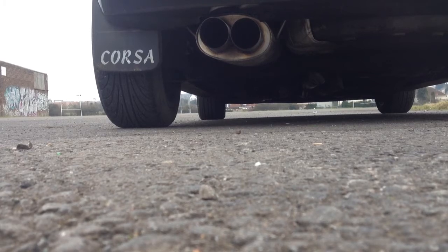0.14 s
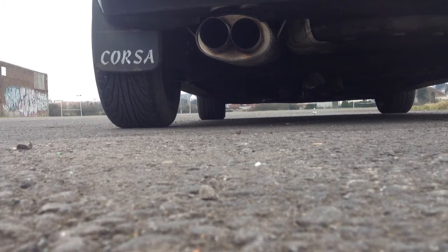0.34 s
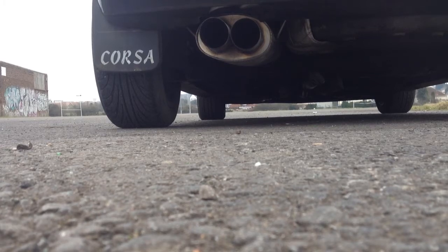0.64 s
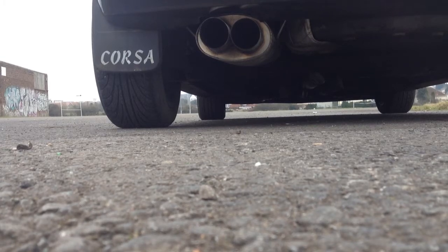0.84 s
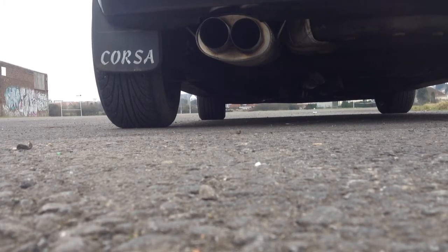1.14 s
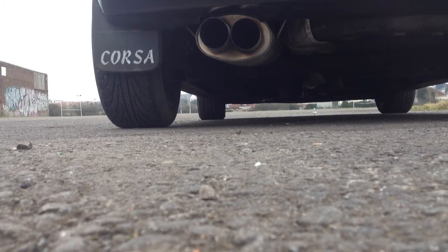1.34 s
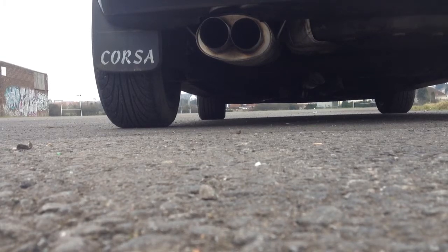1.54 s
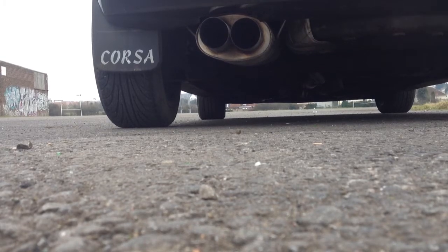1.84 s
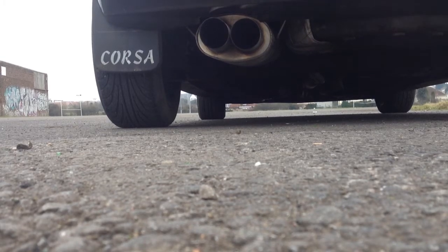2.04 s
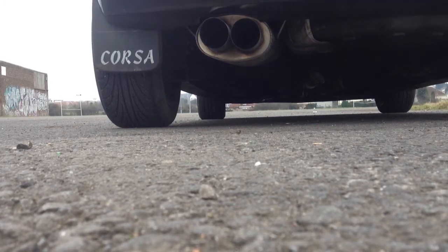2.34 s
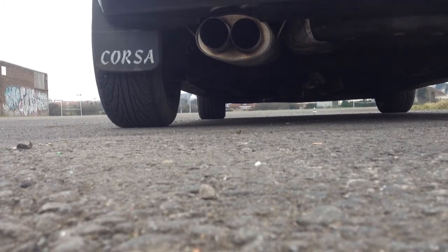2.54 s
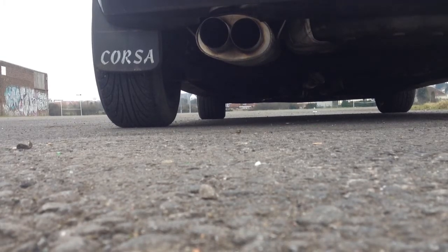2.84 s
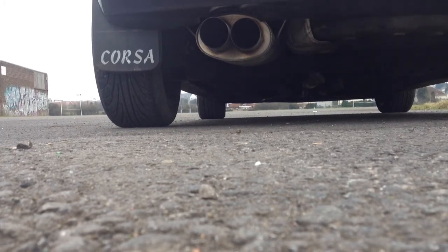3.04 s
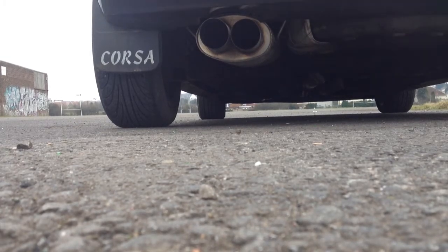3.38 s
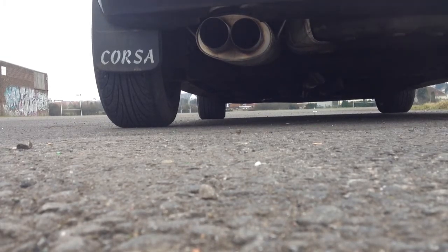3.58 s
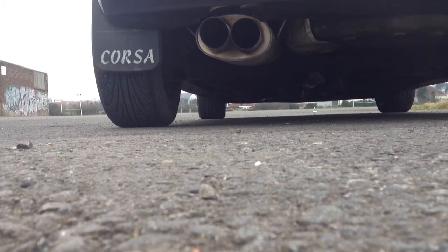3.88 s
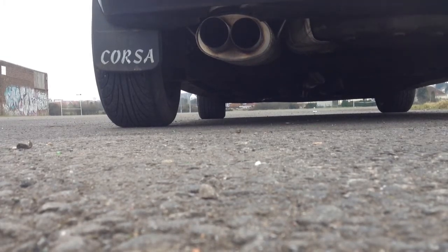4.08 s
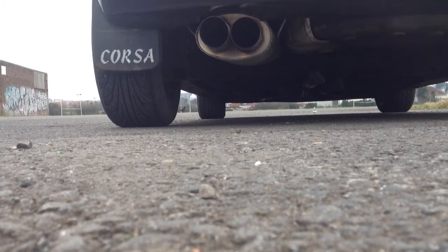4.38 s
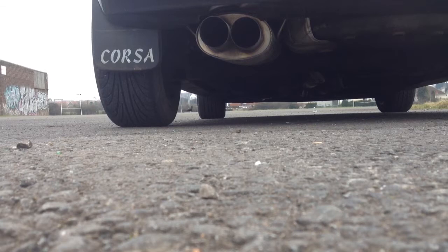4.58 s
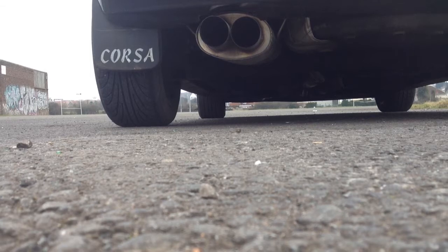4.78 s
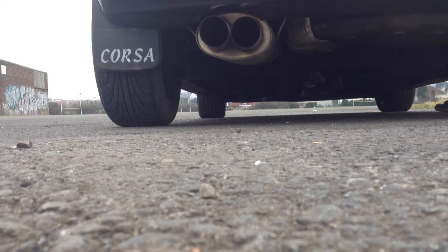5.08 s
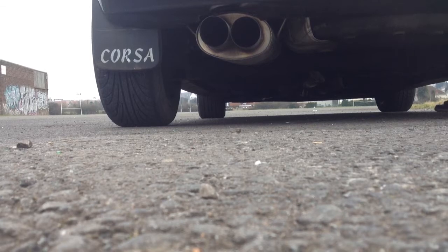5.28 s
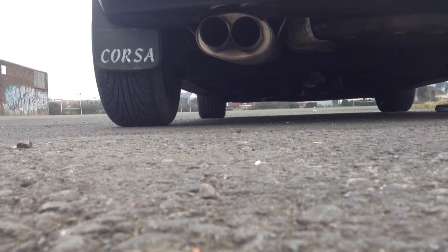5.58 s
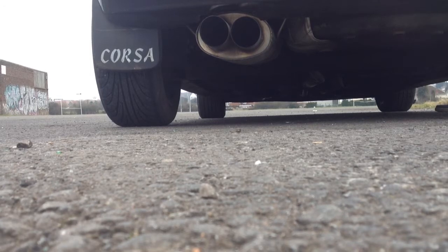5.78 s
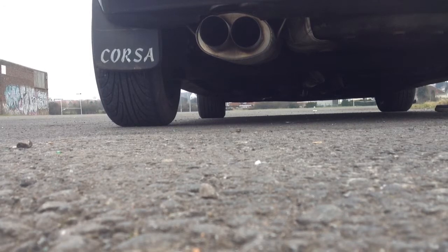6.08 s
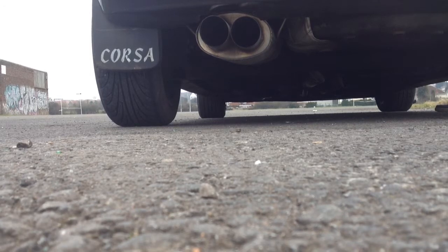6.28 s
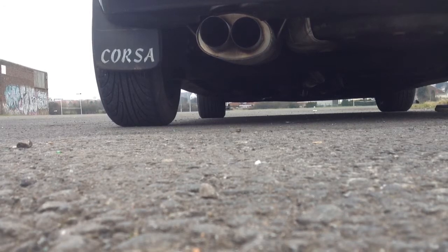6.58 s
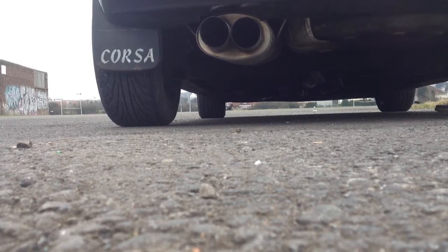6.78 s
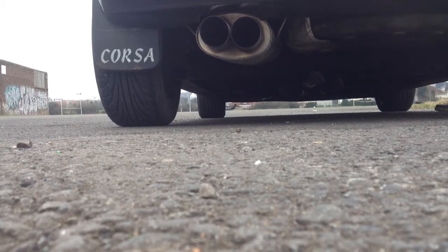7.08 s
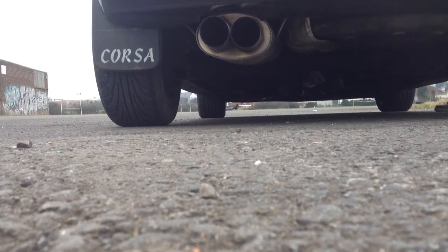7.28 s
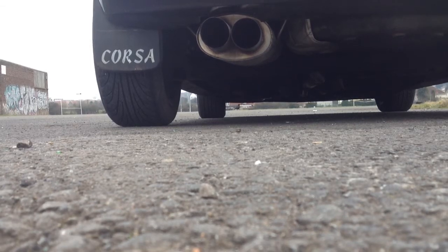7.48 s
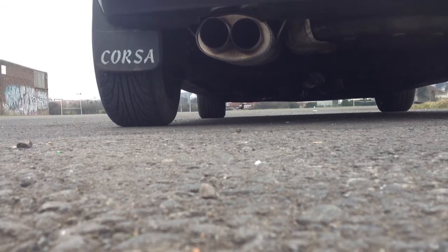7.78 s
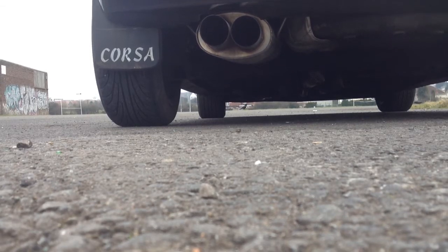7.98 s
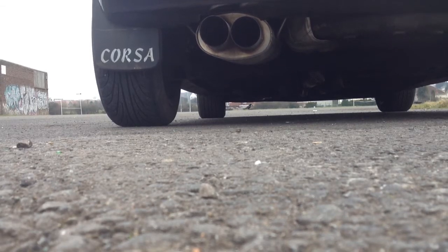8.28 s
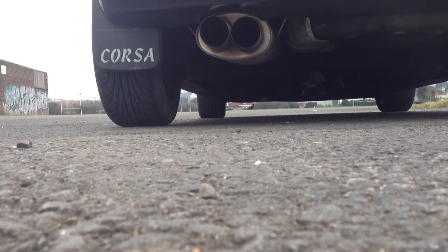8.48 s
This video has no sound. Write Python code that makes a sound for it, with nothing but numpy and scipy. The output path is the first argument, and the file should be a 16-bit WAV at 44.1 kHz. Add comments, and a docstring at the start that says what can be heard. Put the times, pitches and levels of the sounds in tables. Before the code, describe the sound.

Close behind the exhaust, a car engine putters and clatters outdoors; a door slams loudly, then short revs bark and sink back.

```python
"""A small four-cylinder car idles in an open lot, heard from the ground behind its sports exhaust:
uneven puffs boom in the silencer over a clatter of valve gear. Someone gets in with rustles and
knocks, then slams the door; the slam ducks the automatic gain, which takes seconds to creep back.
The throttle is blipped: a hard bark on the way up, a smooth drone over a rushing, rattling engine
as the revs sink. A second blip goes higher, and the sound ends as a third begins."""
import sys
import numpy as np
from scipy import signal
from scipy.fft import rfft, irfft
from scipy.io import wavfile
from scipy.ndimage import uniform_filter1d

SR = 44100
rng = np.random.default_rng(int(sys.argv[2]) if len(sys.argv) > 2 else 0)


def bounce(signal):
    """Save signal as a 16-bit WAV file at the path given by the first command-line argument."""
    frames = np.transpose(np.atleast_2d(signal))
    limited = np.clip(frames, -1, 1)
    pcm = np.round(limited * 32767).astype(np.int16)
    wavfile.write(sys.argv[1], SR, pcm)


N = 380583
TIME = np.arange(N) / SR


def from_db(db):
    """Decibels to gain."""
    return 10 ** (np.asarray(db) / 20)


def unit_rms(x):
    """Scale to unit power."""
    return x / np.sqrt(np.mean(x ** 2) + 1e-20)


def ramp(start, length):
    """Fade from 0 to 1 over the given seconds."""
    return np.clip((TIME - start) / length, 0, 1)


def bell(centre, half):
    """A smooth swell of height 1."""
    return np.exp(-np.minimum(((TIME - centre) / half) ** 2, 50))


def eq(x, curve, size=8192):
    """Minimum-phase equaliser following rows of f/Hz, gain/dB."""
    hz, db = np.transpose(curve)
    grid = np.maximum(np.fft.rfftfreq(size, 1 / SR), 1)
    gain = from_db(np.interp(np.log(grid), np.log(hz), db))
    cepstrum = irfft(np.log(gain))
    cepstrum[1:size // 2] *= 2
    cepstrum[size // 2 + 1:] = 0
    impulse = irfft(np.exp(rfft(cepstrum)))
    return signal.fftconvolve(x, impulse)[:N]


def resonate(x, hz, width_hz):
    """One resonance, gain 1 at its peak."""
    r = np.exp(-np.pi * width_hz / SR)
    feedback = [1, -2 * r * np.cos(2 * np.pi * hz / SR), r * r]
    return signal.lfilter(np.array([1, 0, -1]) * (1 - r * r) / 2, feedback, x + 1e-18)


def noise():
    """White noise."""
    return rng.standard_normal(N)


def narrow_noise(hz, width_hz):
    """Noise twice through one resonance, unit power."""
    return unit_rms(resonate(resonate(noise(), hz, width_hz), hz, width_hz))


# Engine speed, a wavering idle and then the revs: t/s, firing rate/Hz
ENGINE_SPEED = [(0, 26.46), (.6, 25.57), (1.8, 26.1), (2.5, 25.65), (3.5, 26.145), (6.48, 25.61),
                (6.581, 35.35), (6.826, 68.93), (7.239, 56.4), (7.46, 55.51), (7.573, 62.6), (7.709, 89.61),
                (7.942, 83.95), (8.381, 65.81), (8.54, 65.5), (8.63, 72.4)]

def firings():
    """The firing rate, the running count of firings, and the samples where exhaust valves open."""
    rate_hz = np.interp(TIME, *np.transpose(ENGINE_SPEED))
    count = np.cumsum(rate_hz) / SR + .79
    opens = np.flatnonzero(np.diff(np.floor(count))) - int(.008 * SR)
    return rate_hz, count, np.maximum(opens, 0)


# Lope of the four cylinders, one puff each: level/dB
CYLINDER_LOPE = [-3, -1, -0.9, -1]
# Tone of a puff through pipe and silencer: f/Hz, idle level/dB, coasting level/dB, throttle level/dB
PUFF_TONE = [(30, -58, -60, -45), (60, -20, -18, -21), (88.5, -19, -30.5, -11), (129.8, -14, -9, -9.5),
             (165.5, 5.5, -0.5, 8), (207.5, 8, 7, 6.5), (246, 6.5, -6.5, 7.5), (285, -28.5, -24, -10.5),
             (349.5, -29, -8.5, -7.5), (374, -35, -11.5, -6), (434, -36, -38.5, -15.5),
             (480, -36, -40, -14), (588, -46, -46, -28.5), (730, -29, -75, -29.5), (1830, -62, -90, -73)]

def exhaust(opens, throttle, overrun, revved):
    """One puff per firing booms in the silencer: ragged at idle, steadier under load and on overrun."""
    jitter_db = 3.1 + (.5 - 3.1) * throttle[opens]
    jitter_db += (1.15 - jitter_db) * overrun[opens]
    lope_db = np.resize(np.roll(CYLINDER_LOPE, -1), len(opens)) * (1 - revved[opens])
    even, ragged = np.zeros((2, N))
    even[opens] = 1
    ragged[opens] = from_db(lope_db + jitter_db * np.clip(rng.standard_normal(len(opens)), -2.5, 1.3))
    blend = [(1 - throttle) * (1 - revved), (1 - throttle) * revved, throttle]
    hz, *tones = np.transpose(PUFF_TONE)

    def pipe(puffs):
        """Speed and an open throttle give shorter, harder puffs."""
        return sum(eq(puffs * share, np.c_[hz, db]) for share, db in zip(blend, tones))

    # mean power per firing keeps the loudness even as harmonics cross the resonance
    power = np.add.reduceat(pipe(even) ** 2, opens)[:-1] / np.diff(opens)
    midpoints = (opens[1:] + opens[:-1]) / 2
    return pipe(ragged) / np.sqrt(np.interp(np.arange(N), midpoints, power))


def rear_chamber(puffs, revved, hz=300, width_hz=70, idle_db=7, rev_db=-6):
    """The silencer's rear chamber answers each puff late and higher, so it seems to bend upward."""
    ring = puffs
    for _ in range(3):
        ring = resonate(ring, hz, width_hz)
    return ring * from_db(idle_db + (rev_db - idle_db) * revved)


# Low churn of gas in the silencer: f/Hz, level/dB
GAS_TONE = [(30, -35), (60, -1), (110, -12), (190, 16.5), (280, 15.5), (350, 21), (450, -17), (600, -14),
            (1000, -37)]

def gas_rumble(throttle, revved, idle_db=-14, coasting_db=-25, throttle_db=-21):
    """Turbulence rumbles between the puffs, weakest beside them when coasting."""
    shut_db = idle_db + (coasting_db - idle_db) * revved
    level_db = shut_db * (1 - throttle) + throttle_db * throttle
    return unit_rms(eq(noise(), GAS_TONE)) * from_db(level_db)


# The engine's rush at idle and at speed: f/Hz, level/dB
IDLE_RUSH_TONE = [(240, -34.5), (400, -13), (620, -5), (900, -8), (1400, -3), (1930, -6), (2400, -7.5),
                  (3700, -11.5), (5300, -21.5), (6300, -21), (8300, -28), (9400, -34.5), (15400, -36)]
REV_RUSH_TONE = [(240, -10.5), (400, 6), (520, 0.5), (610, -7), (730, -7), (1400, -6), (1930, 1.5),
                 (2250, -7), (3700, -11), (5250, -22), (6450, -20), (8300, -28), (9450, -35.5),
                 (15400, -38.5)]
# Early reflections between asphalt and floor pan: delay/s, level/dB
UNDERBODY_ECHOES = [(.0031, -21), (.0074, -15.5), (0.0136, -32.5), (0.0175, -19), (.0269, -16)]
# Ring of pipe and heat shield: f/Hz, width/Hz, idle level/dB, revved level/dB
METAL_RINGS = [(512, 31, -10.5, -17), (726, 40, -8.5, -14.5), (947, 140, -7.5, -19),
               (1184.7, 39, -4.5, -9.5), (1746, 89, -5.5, -15), (1954, 255, -3.5, -7.5),
               (10600, 430, -59, -33)]

def clatter(count, revved, throb_db=1.32, grain_db=1.5, ring_throb_db=6):
    """Valve gear and rushing air: grainy noise that throbs with the firings and rings in the metal."""
    grains = np.interp(TIME, np.linspace(0, TIME[-1], 3000), rng.standard_normal(3000))
    throb = np.cos(2 * np.pi * (count - .08))
    drive = noise() * from_db(throb_db * throb + grain_db * np.clip(grains, -2, 2))
    rush = (1 - revved) * from_db(2) * unit_rms(eq(drive, IDLE_RUSH_TONE))
    rush += revved * from_db(.5) * unit_rms(eq(drive, REV_RUSH_TONE))
    rush += sum(from_db(db) * np.interp(TIME - s, TIME, rush, left=0) for s, db in UNDERBODY_ECHOES)
    tremolo = from_db(ring_throb_db * throb * (.5 - .57 * revved))
    for hz, width_hz, idle_db, rev_db in METAL_RINGS:
        ring = unit_rms(narrow_noise(hz, width_hz) * tremolo)
        rush += ring * from_db(idle_db + (rev_db - idle_db) * revved)
    return rush


def block_hum(count, db=-67.5):
    """The engine block hums through the body at twice the firing rate."""
    return from_db(db) * np.sqrt(2) * np.sin(2 * np.pi * 2 * count)


# Ambience of the lot: f/Hz, level/dB
LOT_TONE = [(25, -44), (45, -26), (75, -19), (130, 16), (400, 26), (2000, -63), (15000, -17)]

def open_lot(db=-56.5):
    """A faint bed of outdoor rumble and hiss."""
    return from_db(db) * unit_rms(eq(noise(), LOT_TONE))


# The driver's rustles and scuffs: t/s, level/dB, half length/s, f/Hz
SCUFFS = [(.25, -58.5, 0.17, 7800), (.25, -68, 0.2, 13000), (.79, -59, 0.02, 6930), (.85, -60, 0.021, 6900),
          (1.38, -57.5, 0.022, 5260), (2.32, -57.5, .02, 5000), (3.82, -56, 0.011, 5870),
          (5.37, -59, 0.0072, 5500), (5.44, -55, 0.033, 6500), (6.435, -47.5, 0.019, 3950)]

def rustles(width_hz=3200):
    """Light friction: brief swells of airy noise."""
    return sum(from_db(db) * bell(s, half) * narrow_noise(hz, width_hz) for s, db, half, hz in SCUFFS)


# Weak firings in the idle: t/s, depth/dB
WEAK_FIRINGS = [(0.587, 7), (0.749, 4), (.93, 7), (1.05, 5), (1.239, 8), (1.516, 6), (1.86, 8), (2.125, 7),
                (2.471, 6), (2.77, 5), (3.42, 7), (3.98, 2), (4.11, 6), (4.39, 9), (4.675, 13), (4.799, 21),
                (5.08, 3), (5.512, 7), (6.401, 16.5)]

def stumbles_db(sag_s=.034, delay_s=.042, rebound_s=.077):
    """The exhaust level sags on a weak firing and rebounds as the next ones make up for it."""
    return sum(depth_db * (.3 * bell(s + delay_s, rebound_s) - bell(s, sag_s))
               for s, depth_db in WEAK_FIRINGS)


# Modes of door and body shell: f/Hz, width/Hz, level/dB
SHELL_MODES = [(254.8, 21, 9), (460, 11, -2), (552, 22, 6.5), (699.5, 15, 17), (1024, 40, -20),
               (1500, 10, -10), (1480, 110, -16), (1620, 33, -18), (1900, 110, -2), (2110, 59, -5),
               (2370, 30, -5), (2470, 27, -12), (2650, 44, -13), (2800, 43, 6)]

def panel_hits(hits, tone, shell_db, tail_db, tail_t60, tail_hz):
    """Each hit is a dying rattle of panels; the body shell rings on and the lot returns a dull tail."""
    def burst(s, db, cutoff_hz, t60):
        """Dying low-passed noise, scaled to start at db once equalised."""
        lowpass = signal.butter(1, cutoff_hz, fs=SR)
        hz = np.linspace(1, SR / 2, 4096)
        response = np.abs(signal.freqz(*lowpass, hz, fs=SR)[1])
        response *= from_db(np.interp(hz, *np.transpose(tone)))
        age = TIME[:SR // 2]
        dying = rng.standard_normal(len(age)) * from_db(db - 60 * age / t60)
        dulled = signal.lfilter(*lowpass, dying + 1e-18) / np.sqrt(np.mean(response ** 2))
        return np.pad(dulled, (int(s * SR), N))[:N]

    rattle = eq(sum(burst(*hit) for hit in hits), tone)
    tail = eq(sum(burst(s, db + tail_db, tail_hz, tail_t60) for s, db, _, _ in hits), tone)
    shell = sum(from_db(db) * resonate(rattle, hz, width_hz) for hz, width_hz, db in SHELL_MODES)
    return rattle + from_db(shell_db) * np.std(rattle) * unit_rms(shell) + tail


# Bumps inside the car: t/s, level/dB, low-pass/Hz, t60/s
KNOCK_HITS = [(.785, -46, 1228, 0.5), (1.372, -38.5, 1396, 0.097), (1.785, -43, 710, 0.6),
              (2.305, -39.5, 2530, 0.17), (4.009, -24.5, 900, 0.044), (4.016, -25.5, 550, 0.094),
              (4.545, -38.5, 600, 0.14), (4.62, -44, 300, 0.39), (4.99, -36, 1000, 0.12),
              (5.37, -35.5, 3000, 0.06), (5.755, -36.5, 900, 0.11)]
# Tone of a knock through the bodywork: f/Hz, level/dB
KNOCK_TONE = [(30, -36), (70, -21), (120, 3), (300, 6), (550, 4), (1150, 4.5), (1700, -3), (4000, -9),
              (15000, -42)]

def cabin_knocks():
    """The driver's small knocks come muffled through the bodywork."""
    return panel_hits(KNOCK_HITS, KNOCK_TONE, shell_db=-14.5, tail_db=-14, tail_t60=.32, tail_hz=696)


# The stacked hits of one slam: t/s, level/dB, low-pass/Hz, t60/s
DOOR_HITS = [ (3.128, -24, 805, 0.17), (3.149, -11, 2200, 0.23), (3.158, -.5, 2000, 0.07),
             (3.16, -10, 12000, 0.077), (3.175, -8.5, 4000, 0.11), (3.186, -14.5, 596, 0.21)]
# Tone of the door's crash: f/Hz, level/dB
DOOR_TONE = [(30, -39), (58, -42), (88, -6), (150, -0.5), (270, 6), (350, -0.5), (540, 3.5), (740, 0),
             (1100, -3), (2000, -1.5), (2900, -8.5), (4000, -14), (5600, -27), (8000, -25), (15000, -35.5)]

def door_slam():
    """The door meets its seal, catches the latch, slams and shudders."""
    return panel_hits(DOOR_HITS, DOOR_TONE, shell_db=-13, tail_db=-17, tail_t60=.3, tail_hz=497)


def gain_control(x, threshold_db=-8.5, release_db_per_s=1.5, window_s=.016):
    """Anything over the threshold ducks the gain at once; it creeps back over seconds."""
    power = np.abs(uniform_filter1d(x ** 2, int(window_s * SR)))
    over_db = np.maximum(10 * np.log10(power + 1e-12) - threshold_db, 0)
    release_db = release_db_per_s * TIME
    duck_db = np.maximum.accumulate(over_db + release_db, axis=-1) - release_db
    return x * from_db(-duck_db)


# Chirps of the pedal: t/s, level/dB, half length/s, f/Hz
CHIRPS = [(6.44, -45, 0.016, 4840), (7.52, -50, 0.026, 4820), (8.545, -41, 0.0084, 4940)]

def pedal_squeaks(width_hz=120):
    """Friction gives a thin squeak as the pedal goes down."""
    return sum(from_db(db) * bell(s, half) * narrow_noise(hz, width_hz) for s, db, half, hz in CHIRPS)


# Throttle blips: press/s, attack/s, release/s, drone end/s, drone fade/s, opening in the drone/0-1
THROTTLE_BLIPS = [(6.44, .125, 6.853, 7.26, .03, .12), (7.44, .16, 7.748, 8.41, .1, .27),
                  (8.53, .09, 8.8, 9.2, .1, .1)]

def accelerator(shut_s=.0076, gap_s=.022, drone_rise_s=.014):
    """Pedal, overrun and throttle envelopes, 0-1: it opens, snaps shut, and the drone builds up."""
    pedal, overrun, throttle = np.zeros((3, N))
    for pressed, attack_s, released, drone_end, fade_s, left_open in THROTTLE_BLIPS:
        down = ramp(pressed, attack_s) * (1 - ramp(released, shut_s))
        drone = ramp(released + gap_s, drone_rise_s) * (1 - ramp(drone_end, fade_s))
        pedal += down
        overrun += drone
        throttle += down + left_open * drone
    return pedal, overrun, np.clip(throttle, 0, 1)


def scene(idle_hz=26):
    """Mono mix of exhaust, engine, door, driver and lot."""
    rate_hz, count, opens = firings()
    pedal, overrun, throttle = accelerator()
    octaves = np.log2(rate_hz / idle_hz)
    revved = np.clip((rate_hz - 27) / 36, 0, 1)   # crossfade from idle to revved tone
    puffs = exhaust(opens, throttle, overrun, revved)
    boom = puffs + rear_chamber(puffs, revved) + gas_rumble(throttle, revved)
    boom_db = -37 + 7 * octaves + 15.5 * pedal + 9 * overrun + stumbles_db()
    revving_s = np.maximum(TIME - THROTTLE_BLIPS[0][0], 0)
    clatter_db = -51.3 + 11 * octaves + .86 * pedal + 1.5 * revving_s
    engine = from_db(boom_db) * boom + from_db(clatter_db) * clatter(count, revved) + block_hum(count)
    return (engine + door_slam() + cabin_knocks() + rustles() + pedal_squeaks() + open_lot())[None]


def record(dry, low_cut_hz=36, ceiling=.7, high_cut_hz=15400):
    """Trim the sub-bass, duck on loud sounds, soft-clip the peaks and cut the top."""
    low_cut = signal.butter(2, low_cut_hz, "high", fs=SR, output="sos")
    high_cut = signal.ellip(10, .1, 80, high_cut_hz, fs=SR, output="sos")
    ducked = gain_control(signal.sosfilt(low_cut, dry))
    rounded = ducked / (1 + (ducked / ceiling) ** 6) ** (1 / 6)
    return signal.sosfilt(high_cut, rounded)


dry = scene()
out = record(dry)
bounce(out)
```